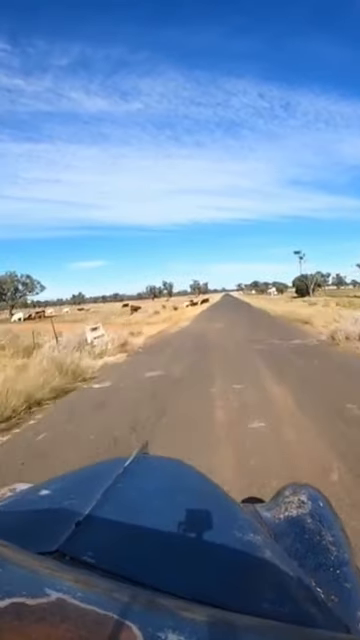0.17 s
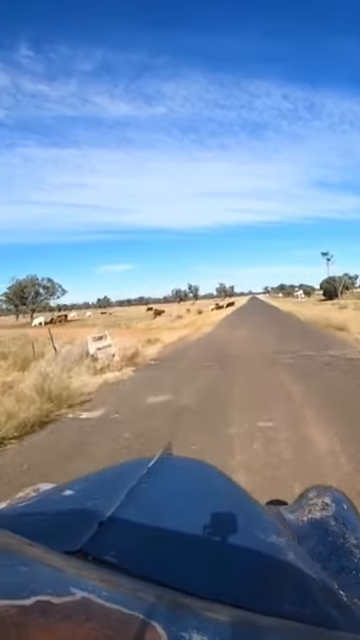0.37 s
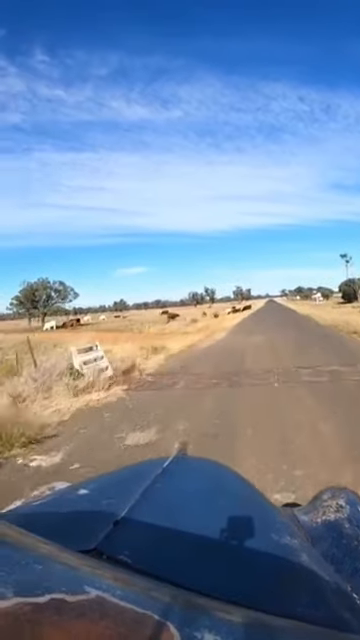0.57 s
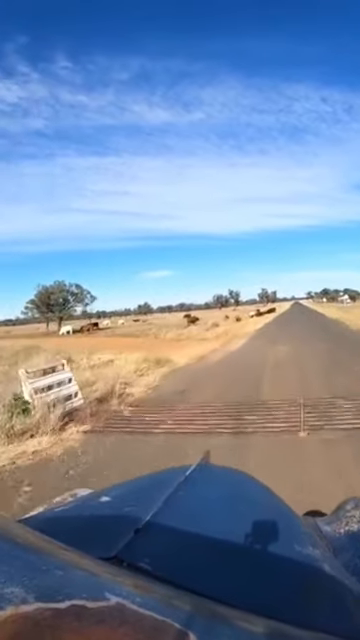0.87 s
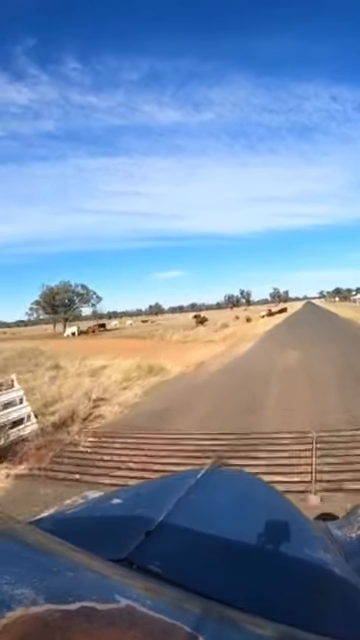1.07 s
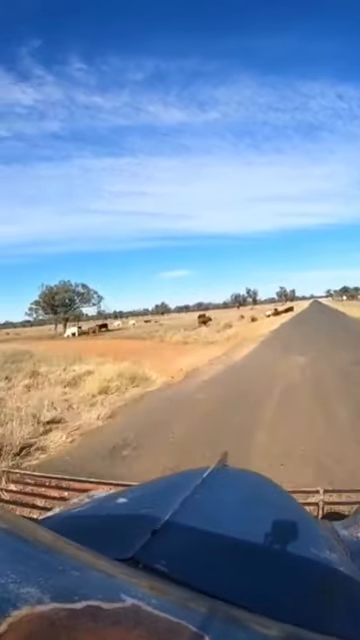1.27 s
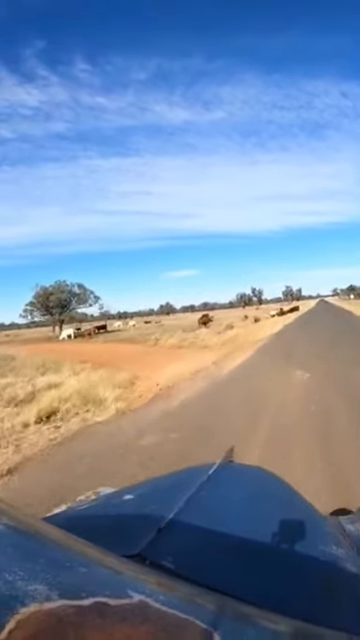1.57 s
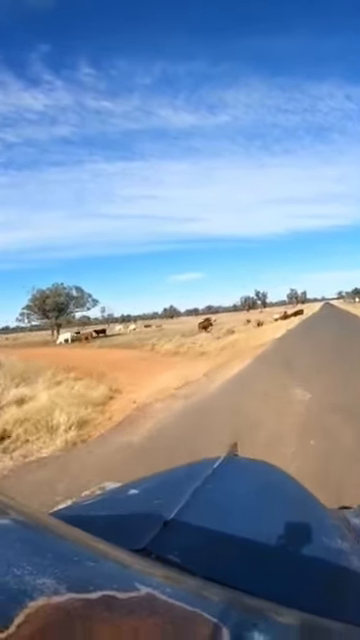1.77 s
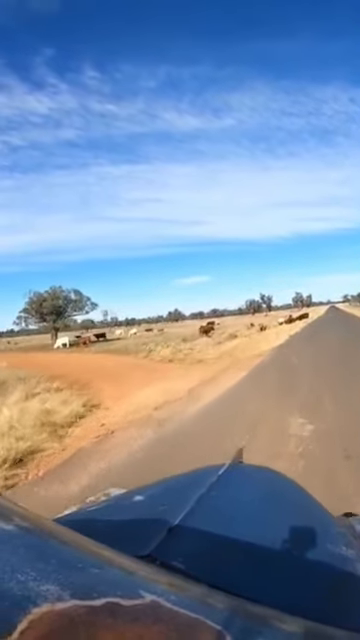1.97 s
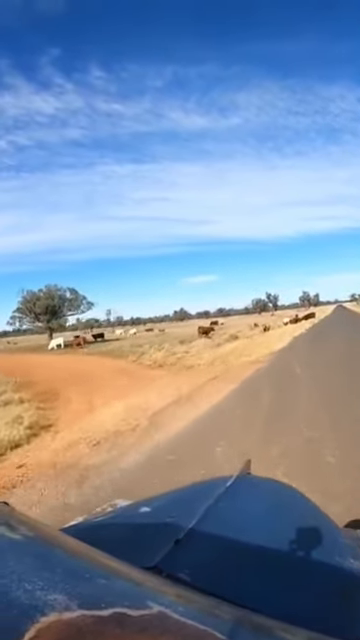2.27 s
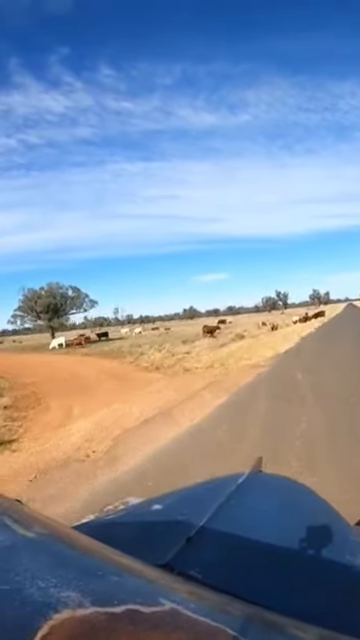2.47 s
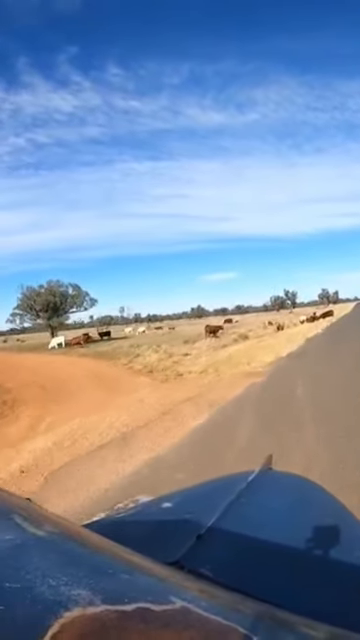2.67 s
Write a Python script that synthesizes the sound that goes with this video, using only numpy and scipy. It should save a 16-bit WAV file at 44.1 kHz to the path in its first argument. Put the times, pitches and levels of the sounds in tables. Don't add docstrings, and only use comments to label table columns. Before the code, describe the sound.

Outdoors on a country road, a microphone fixed to an old car picks up heavy rumble and light ticking, a brief early jolt, then rapid overloaded thuds and clattering over a cattle grid, settling back to rumble.

```python
import sys
import numpy as np
from scipy import signal
from scipy.fft import rfft, irfft
from scipy.io import wavfile
from scipy.ndimage import uniform_filter1d

SR = 44100
rng = np.random.default_rng(int(sys.argv[2]) if len(sys.argv) > 2 else 0)


def output_pcm(signal):
    pcm = np.clip(np.atleast_2d(signal).T, -1, 1) * 32767
    wavfile.write(sys.argv[1], SR, np.round(pcm).astype(np.int16))


def nominal_scale(level):
    x = np.asarray(level, float) / 20
    return 10 ** x


N = 123921
T = np.arange(N) / SR


def rms_one(x):
    return x / np.sqrt(np.mean(x ** 2) + 1e-20)


def curve(rows, axis=1):
    return np.interp(T, np.array(rows)[:, 0], np.array(rows)[:, axis])


def drift(rate_hz):
    r = np.exp(-80 * np.pi * rate_hz / SR)
    white = rng.standard_normal(N // 40 + 2002)
    slow = signal.lfilter([1], [1, -2 * r, r * r], white)[2000:]
    return np.interp(np.arange(N) / 40, np.arange(len(slow)), rms_one(slow))


def colour(x, points):
    hz, db = np.transpose(points)
    f = np.maximum(np.fft.rfftfreq(N, 1 / SR), 1)
    octaves_outside = np.maximum(np.log2(hz[0] / f), 0) + np.maximum(np.log2(f / hz[-1]), 0)
    gain_db = np.interp(np.log(f), np.log(hz), db) - 24 * octaves_outside
    return rms_one(irfft(rfft(x) * nominal_scale(gain_db), N))


def resonate(x, hz, width_hz):
    r = np.exp(-np.pi * width_hz / SR)
    poles = [1, -2 * r * np.cos(2 * np.pi * hz / SR), r * r]
    return signal.lfilter([(1 - r * r) / 2, 0, (r * r - 1) / 2], poles, x + 1e-18)


def band(x, hz, width_hz):
    return rms_one(resonate(resonate(x, hz, width_hz), hz, width_hz))


def impulses(s, height):
    kicks = np.full(N, 1e-18)
    kicks[(np.array(s) * SR).astype(int)] = height
    return kicks


def die_away(kicks, fade_s, gain=1):
    return signal.lfilter([gain], [1, -np.exp(-1 / (fade_s * SR))], kicks)


def soft(x, cut_hz):
    return signal.sosfilt(signal.butter(3, cut_hz, fs=SR, output="sos"), x)


def strike(events, modes, spread_db, contact_s, chatter):
    s, db = np.transpose(events)[:2]
    luck, out = rng.standard_normal((len(s), 2 * len(modes))), 0
    rebounds = 7 * rng.standard_normal(N) * (rng.random(N) < .02)
    rebound_gain = np.sqrt(1 - np.exp(-2 / (contact_s * SR)))
    for k, (hz, level_db, t60_s) in enumerate(modes):
        sign = np.sign(luck[:, -1]) * (-1) ** k
        clicks = impulses(s, nominal_scale(db + level_db + spread_db * luck[:, k]) * sign)
        clicks = clicks + chatter * rebounds * die_away(clicks, contact_s, rebound_gain)
        r, w = nominal_scale(-60 / (t60_s * SR)), 2 * np.pi * hz / SR
        out = out + signal.lfilter([0, np.sin(w)], [1, -2 * r * np.cos(w), r * r], clicks)
    return out


# (time [s], gain [dB])
GAIN_DB = [
    (0, 0),
    (1.45, -1.5),
    (1.75, -3.5),
    (2.05, -2),
    (2.2, -6.5),
    (2.3, -8.5),
    (2.5, -7.5),
    (2.81, -1.5),
]
# (frequency [Hz], level [dB per Hz])
RUMBLE_SPECTRUM = [(11, -21.5), (18, -8), (34, 2), (70, -9), (118, -2.5), (188, -10), (261, -12.5),
                   (527, -31.5), (640, -48.5), (830, -81.5), (1410, -120)]
# (frequency [Hz], level [dB per Hz])
HISS_SPECTRUM = [(380, -36.5), (640, -1.5), (1200, -0.5), (2600, -21), (3340, -16.5), (4540, -26.5),
                 (5260, -16), (5550, -22), (15500, -41.5)]
# (frequency [Hz], width [Hz], level [dB])
GAP_WHISTLES = [(5216, 240, -72), (1650, 280, -63)]


def road():
    rumble_db, hiss_db = -14.5, -51.5
    lumps, white = drift(7.4), rng.standard_normal((3, N))
    rumble = nominal_scale(rumble_db + 1.0 * lumps) * colour(white[0], RUMBLE_SPECTRUM)
    hiss = nominal_scale(hiss_db + 0.77 * lumps + 2.1 * drift(37)) * colour(white[1], HISS_SPECTRUM)
    whistles = sum(nominal_scale(db + 3.4 * drift(25)) * band(white[2], hz, width_hz)
                   for hz, width_hz, db in GAP_WHISTLES)
    return nominal_scale(curve(GAIN_DB)) * (rumble + hiss + whistles)


# (time [s], rate [Hz], level [dB])
ENGINE_RUN = [(0, 27.36, -16), (.3, 26.22, -21), (.45, 27.52, -19.5), (.62, 29.47, -11.5),
              (.9, 26.81, -21.5), (1.43, 27.43, -14), (1.6, 27.48, -18), (2.1, 26.93, -31),
              (2.2, 26.77, -42.5), (2.42, 26, -15), (2.81, 26, -15.5)]
# (multiple of cycle rate, level [dB], wander [dB])
ENGINE_ORDERS = [(1, 2, 4), (4, -1, 3.5), (5, -4.5, 3.5), (10, -14.5, 4.5)]


def engine():
    cycle_rad = 2 * np.pi * np.cumsum(curve(ENGINE_RUN)) / SR
    out = 0
    for k, db, wander_db in ENGINE_ORDERS:
        level = nominal_scale(db - 2 + wander_db * drift(4.83))
        out = out + level * np.sin(k * cycle_rad + (.5 + 0.084 * k) * drift(3.93))
    return nominal_scale(curve(ENGINE_RUN, axis=2)) * out


# (time [s], peak level [dB], centre frequency [Hz])
GRIT_HITS = [(0.0, -66.5, 12000), (.084, -76, 7000), (.392, -56.5, 13000), (.45, -48, 11000),
             (0.475, -55.5, 7000), (0.639, -56, 6900), (.735, -52, 9000), (0.7495, -42.5, 6000),
             (1.797, -45, 14600), (2.058, -53, 8000), (2.074, -56, 6000), (2.135, -52, 6500),
             (2.145, -53, 6000), (2.159, -55, 6500)]


def grit():
    t60_s, width_ratio = .018, .55
    white, out = rng.standard_normal(N), 0
    for s, db, hz in GRIT_HITS:
        decay = (T > s) * nominal_scale(-60 * np.maximum(T - s, 0) / t60_s)
        out = out + nominal_scale(db) * decay * band(white, hz, width_ratio * hz)
    return out


# (time [s], peak level [dB])
TICK_TIMES = [(0.0327, -40), (0.0888, -33.5), (0.1684, -42), (0.2383, -30), (0.355, -25.5), (0.4222, -38.5),
              (0.478, -47.5), (0.632, -27.5), (0.691, -41), (0.7503, -26), (0.7624, -43), (0.7811, -42),
              (0.7864, -33), (0.8001, -22), (0.846, -25.5), (0.9175, -44), (0.9466, -42), (1.038, -41.5),
              (1.0994, -38), (1.1462, -42), (1.2441, -38.5), (1.365, -39.5), (1.5389, -21)]
# (frequency [Hz], level [dB], T60 [s])
LOOSE_MODES = [(1400, -7, .006), (2100, -7, .005), (2600, -5, .006), (3150, -3, .010), (3650, -11, .005),
               (4200, -14, .006)]


def ticks():
    taps = strike(TICK_TIMES, LOOSE_MODES, spread_db=1.5, contact_s=.001, chatter=.2)
    return nominal_scale(-3) * soft(taps, cut_hz=5200)


# (time [s], peak level [dB])
ROAD_BUMPS = [(0.076, -15), (0.148, -16.5), (0.4, -25), (0.464, -6.5), (0.52, -27.5), (0.616, -19),
              (0.682, -2), (0.739, -16.5), (0.784, -12), (0.95, -28), (1.118, -11), (1.279, -5),
              (1.376, -20), (1.449, -7), (1.489, 1.5), (1.533, 8.5), (1.564, 1), (1.672, -16), (1.782, -14),
              (1.931, -13), (2.028, 0), (2.149, -14.5), (2.506, -16.5), (2.677, -6), (2.71, -29)]
# (frequency [Hz], level [dB], T60 [s])
FLOOR_MODES = [(242, -3.5, 0.042), (292, 2.5, .05), (370, -11, 0.079), (470, -7.5, 0.016), (623, -22, 0.01)]


def bumps():
    blows = strike(ROAD_BUMPS, FLOOR_MODES, spread_db=2.0, contact_s=.008, chatter=.4)
    return nominal_scale(-11.5) * soft(blows, cut_hz=650)


# (time [s], peak level [dB])
BAR_HITS = [(1.4578, -41.5), (1.4765, -42), (1.49, -36), (1.5184, -18.5), (1.531, -41), (1.5667, -13.5),
            (1.571, -6.5), (1.573, -26), (1.5917, -8.5), (1.5962, -12), (1.599, -22), (1.6182, -11),
            (1.6419, -8.5), (1.6671, -26), (1.6864, -16), (1.6915, -27), (1.722, -19.5), (1.728, -28),
            (1.7685, -48), (1.7834, -49), (1.8108, -25), (1.8273, -32), (1.844, -43), (1.851, -37),
            (1.8557, -24), (1.861, -29), (1.8852, -34), (1.919, -39), (1.936, -32), (1.958, -32.5),
            (1.9912, -36), (2.058, -39)]


def bar_throb_db():
    throb_db, fade_s = 9, 0.012
    kicks = impulses([s for s, _ in BAR_HITS], 1)
    return throb_db * (np.minimum(die_away(kicks, fade_s), 1) - .4)


# (time [s], rattle level [dB], boom level [dB])
BODY_SHAKE = [(.71, -83.5, -39), (.74, -58.5, -14.5), (.765, -53.5, -12.5), (.83, -70.5, -21),
              (.9, -97, -44.5), (1.44, -93, -40), (1.46, -59, -29), (1.5, -54.5, -8), (1.54, -50, -8.5),
              (1.58, -48, -12.5), (1.7, -52, -8.5), (1.745, -64, -18), (1.85, -59.5, -19.5),
              (1.9, -50.5, -18), (2.0, -52.5, -17.5), (2.05, -60.5, -20), (2.1, -82, -39),
              (2.15, -60.5, -34), (2.19, -92.5, -69)]
# (frequency [Hz], level [dB per Hz])
BOOM_SPECTRUM = [(15, -33), (25, -6), (48, -9.5), (144, 2), (238, -0.5), (505, -16.5), (1020, -31.5),
                 (1350, -34), (1800, -42.5), (2340, -66), (3960, -120)]


def boom():
    throb_db = .5 * uniform_filter1d(bar_throb_db(), size=300)
    level_db = curve(BODY_SHAKE, axis=2) + throb_db + 2.0 * drift(24)
    return nominal_scale(level_db) * colour(rng.standard_normal(N), BOOM_SPECTRUM)


# (frequency [Hz], level [dB per Hz])
RATTLE_SPECTRUM = [(600, -15), (1100, -2.5), (1800, -1.5), (3780, -6), (4360, -9), (6490, -8.5),
                   (13500, -17.5), (15600, -27.5)]
# (frequency [Hz], width [Hz], level [dB], start [s], end [s])
TRIM_RINGS = [(3780, 80, -13, 1.91, 2.015), (10200, 500, -18, 1.875, 1.93), (14600, 400, -17, 1.56, 1.71),
              (14600, 400, -21, 1.875, 2.0)]


def rattle():
    contacts_per_s = 2500
    hit = rng.random(N) < contacts_per_s * nominal_scale(3 * drift(40)) / SR
    grains = nominal_scale(2.4 * np.minimum(rng.exponential(1, N), 3)) * rng.choice([-1, 1], N) * hit
    grains = rms_one(grains) + .5 * rng.standard_normal(N)
    out = colour(grains, RATTLE_SPECTRUM)
    for hz, width_hz, db, start_s, end_s in TRIM_RINGS:
        loose = (T > start_s) * (T < end_s)
        out = out + nominal_scale(db + 4 * drift(25)) * loose * band(grains, hz, width_hz)
    throb_db = 0.4 * uniform_filter1d(bar_throb_db(), size=60)
    return nominal_scale(curve(BODY_SHAKE) + 5.5 + 1.5 * drift(90) + throb_db) * out


# (time [s], peak level [dB])
PANEL_SLAPS = [(0.7347, -34.5), (0.74, -44.5), (0.7476, -41), (0.783, -45), (1.4595, -37.5), (1.4785, -36),
               (1.4905, -29.5), (1.5004, -40), (1.5274, -36), (1.5274, -33), (1.5703, -40), (1.5764, -37),
               (1.5901, -36), (1.5994, -41), (1.6172, -35), (1.6216, -38), (1.6415, -37), (1.6426, -34.5),
               (1.6643, -30), (1.6703, -27.5), (1.6874, -40), (1.714, -33), (1.7284, -41), (1.7624, -49),
               (1.7804, -47), (1.811, -52), (1.828, -42), (1.836, -39), (1.855, -46), (1.875, -36),
               (1.8862, -34), (1.8945, -42), (1.9094, -43), (1.9197, -30.5), (1.933, -39), (1.942, -39),
               (1.958, -32), (1.9864, -29), (1.9914, -27.5), (2.013, -46), (2.0294, -44), (2.0558, -34),
               (2.0741, -42)]


def slaps():
    level_db, fade_s = -3, 0.0021
    s, db = np.transpose(PANEL_SLAPS)
    puffs = die_away(impulses(s, nominal_scale(db + level_db)), fade_s)
    noise = rng.standard_normal(N) * (0.36 + 2.0 * (rng.random(N) < .1))
    return puffs * soft(colour(noise, RATTLE_SPECTRUM), cut_hz=8500)


# (time [s], peak level [dB])
AXLE_JOLTS = [
    (.762, 1),
    (.788, -12),
    (1.445, 0.5),
    (1.487, -2.5),
    (1.52, -8),
    (1.803, -4.5),
    (1.875, -6),
    (1.929, -2),
    (1.977, -7.5),
    (2.03, -7),
]
# (frequency [Hz], level [dB], T60 [s])
AXLE_MODES = [(132, -3, 0.09), (165, -6, 0.057), (204, -5.5, .07), (309, -10, 0.024)]


def axle():
    return soft(strike(AXLE_JOLTS, AXLE_MODES, spread_db=1.5, contact_s=0.0067, chatter=.2), cut_hz=800)


# (frequency [Hz], level [dB], T60 [s])
PANEL_MODES = [(142, -8.5, 0.016), (197.2, -4, 0.034), (260.4, -3.5, 0.032), (342.8, -2.5, 0.048),
               (543, -8.5, 0.045), (668, -9.5, 0.016)]


def panels():
    hits = [(s, -5 + .5 * db) for s, db in BAR_HITS]
    return soft(strike(hits, PANEL_MODES, spread_db=4.0, contact_s=0.0041, chatter=0.51), cut_hz=800)


# (frequency [Hz], level [dB], T60 [s])
BRACKET_MODES = [(990, -14, 0.018), (1275, -3, 0.013), (2050, -5, 0.0074), (2520, -5.5, 0.007),
                 (2960, -9.5, 0.01), (3460, -12.5, 0.0042), (4900, -19, 0.0044)]


def bracket():
    knocks = strike(BAR_HITS, BRACKET_MODES, spread_db=2.0, contact_s=.002, chatter=.5)
    return nominal_scale(-7) * soft(knocks, cut_hz=6500)


def hop():
    start_s, rate_hz, level_db, t60_s, swell_s = 2.1, 26, -4.5, 0.28, 0.04
    t = np.maximum(T - start_s, 0)
    envelope = nominal_scale(level_db - 60 * t / t60_s) * np.minimum(t / swell_s, 1)
    return envelope * np.sin(2 * np.pi * rate_hz * t)


def scene():
    side_db, side_treble_db = -39.5, -21
    cattle_grid = boom() + rattle() + slaps() + axle() + panels() + bracket() + hop()
    mid = road() + engine() + grit() + ticks() + bumps() + cattle_grid
    treble = signal.sosfilt(signal.butter(4, 3800, "high", fs=SR, output="sos"), mid)
    side = nominal_scale(side_db) * (.5 + drift(30)) * mid + nominal_scale(side_treble_db) * drift(200) * treble
    return np.array([mid + side, mid - side])


def low_pass(x):
    return signal.sosfilt(signal.butter(12, 15930, fs=SR, output="sos"), x)


# (start [s], end [s], share shut [0-1])
MIC_STOPS = [(1.509, 1.52, 0.95), (1.551, 1.557, 1), (1.659, 1.659, 0.5), (1.774, 1.78, 0.93),
             (1.795, 1.799, 0.82), (1.841, 1.846, 0.3), (1.867, 1.873, 0.98), (1.965, 1.974, 0.88),
             (2.021, 2.023, 0.4), (2.118, 2.127, 0.74), (2.175, 2.187, 0.84)]


def record(dry):
    edge_s, open_s, lead_s, relax_s = .003, .001, .004, .0045
    swing = -0.36
    passing = np.minimum((T[-1] - T) / .003 + .4, 1)
    offset = np.zeros(N)
    for start, end, share in MIC_STOPS:
        shut = np.interp(T, [start - edge_s, start, end, end + open_s], [0, 1, 1, 0])
        passing = passing * (1 - share * shut)
        rise = np.sin(np.pi / 2 * np.clip((T - start) / lead_s + 2, 0, 1)) ** 2
        relax = np.exp(-np.maximum(T - start + lead_s, 0) / relax_s)
        offset = offset + swing * share ** 2 * rise * relax
    wet = np.tanh(dry * passing + offset)
    mix = signal.sosfilt(signal.cheby2(12, 34, 15800, fs=SR, output="sos"), wet)
    return low_pass(mix)


dry = scene()
out = record(dry)
output_pcm(out)
```